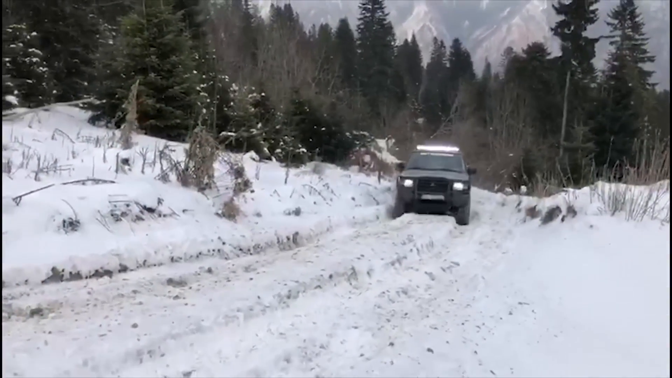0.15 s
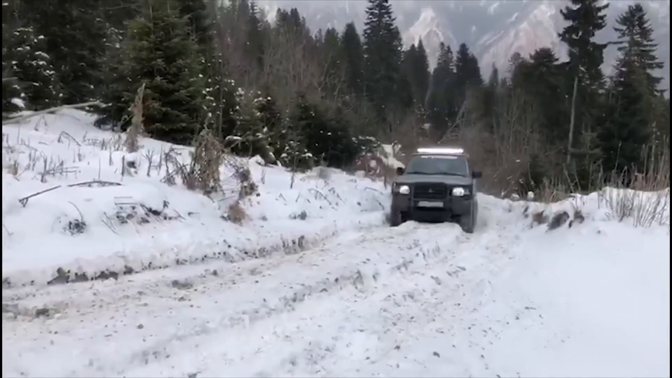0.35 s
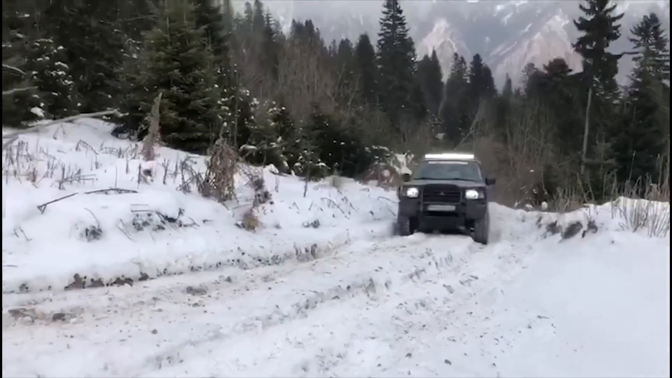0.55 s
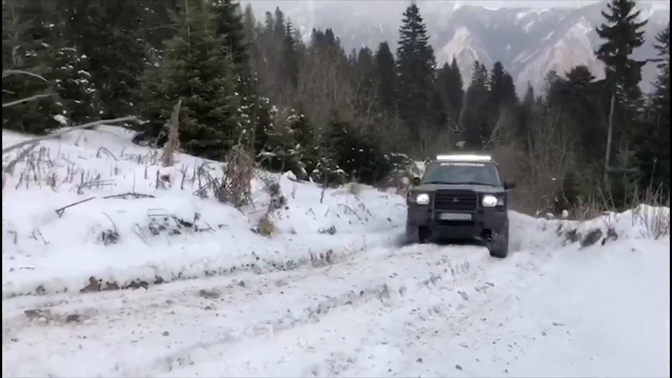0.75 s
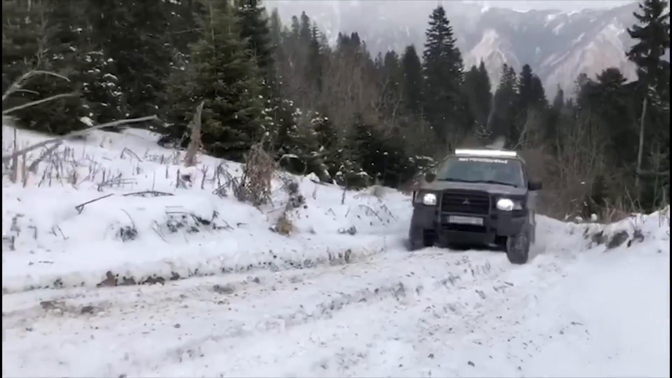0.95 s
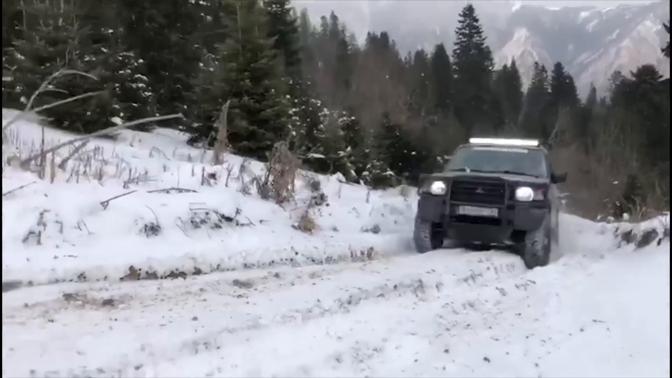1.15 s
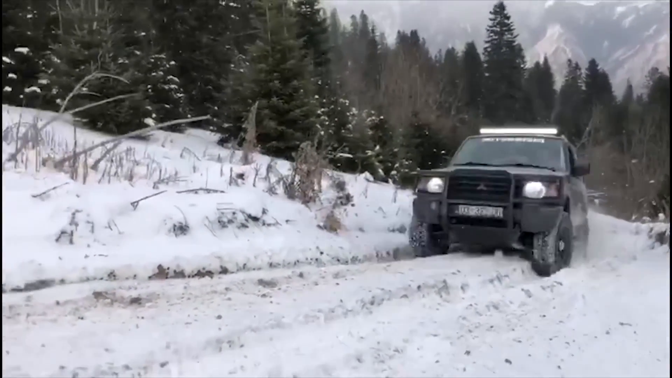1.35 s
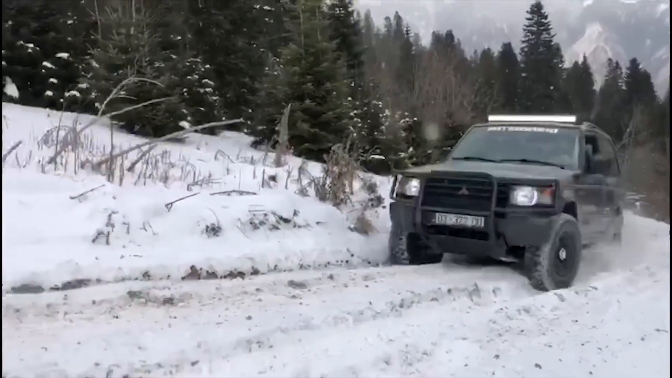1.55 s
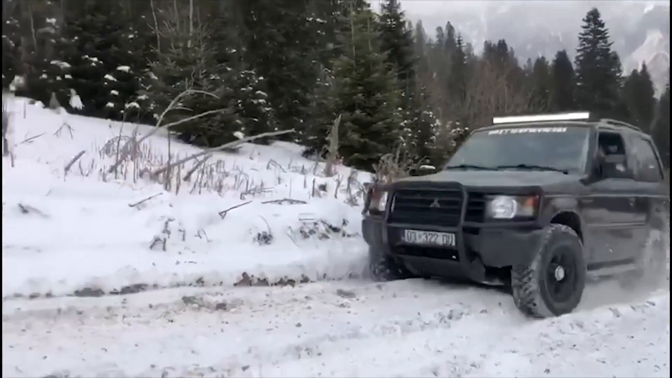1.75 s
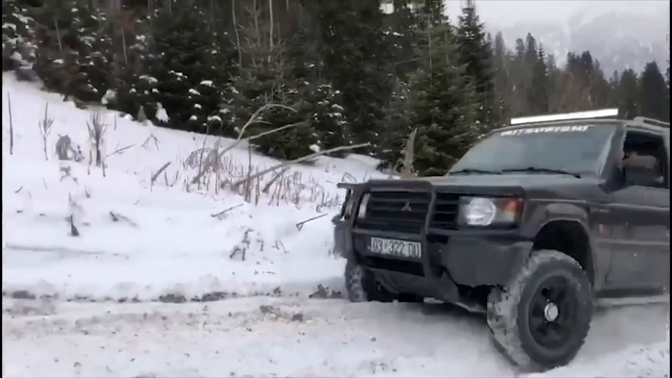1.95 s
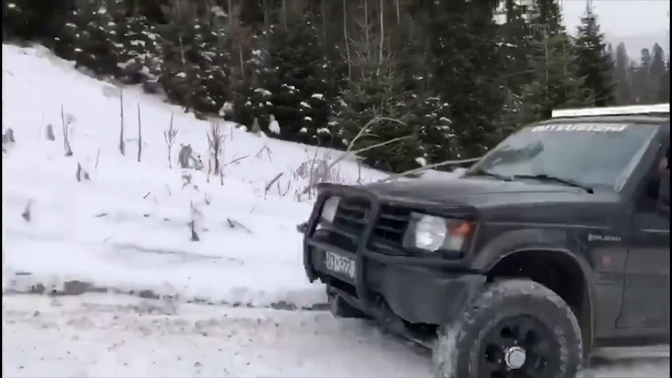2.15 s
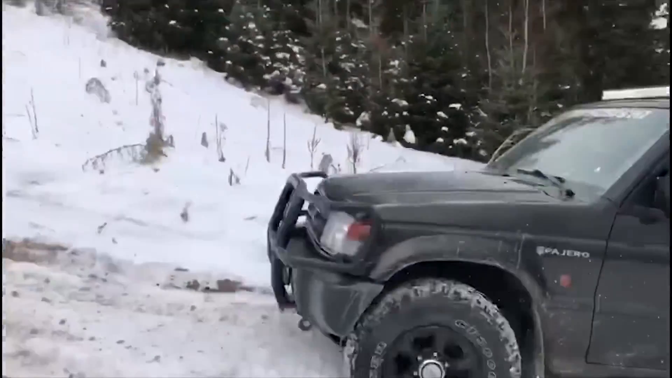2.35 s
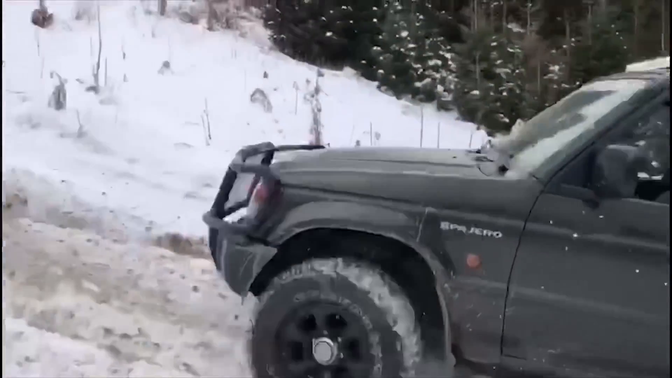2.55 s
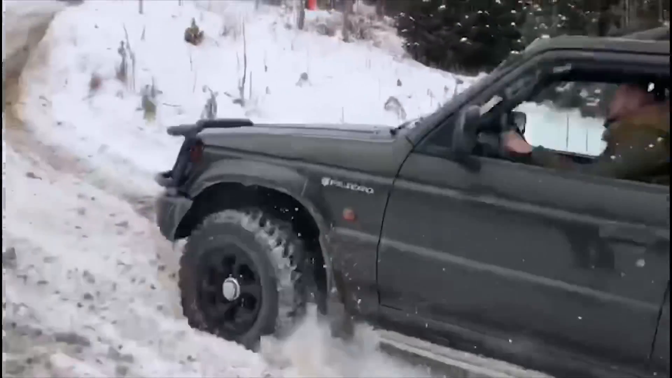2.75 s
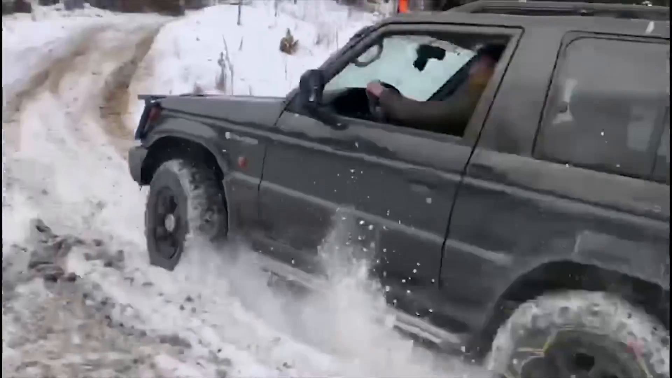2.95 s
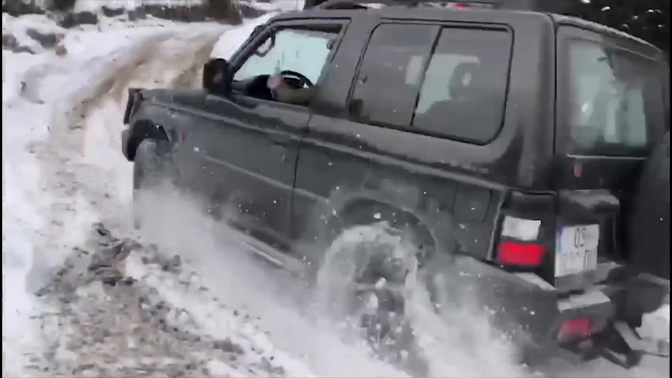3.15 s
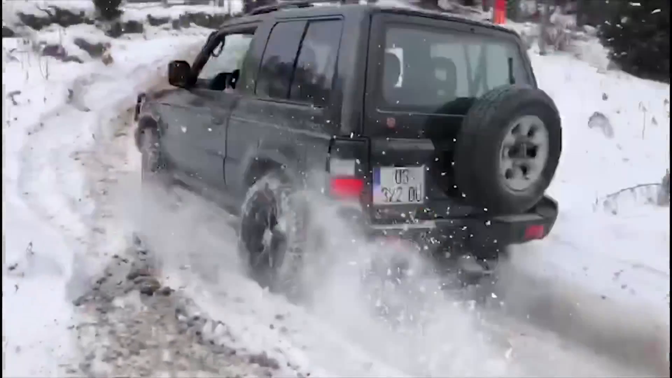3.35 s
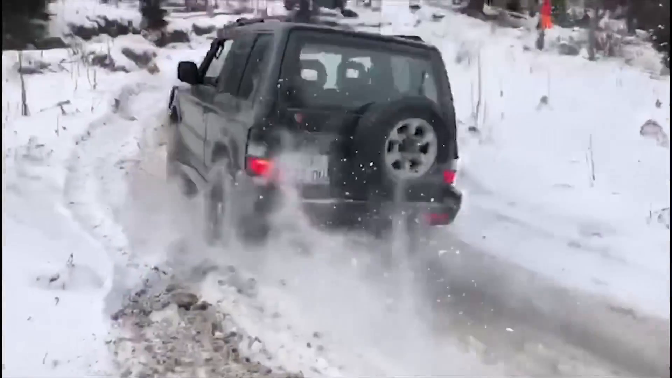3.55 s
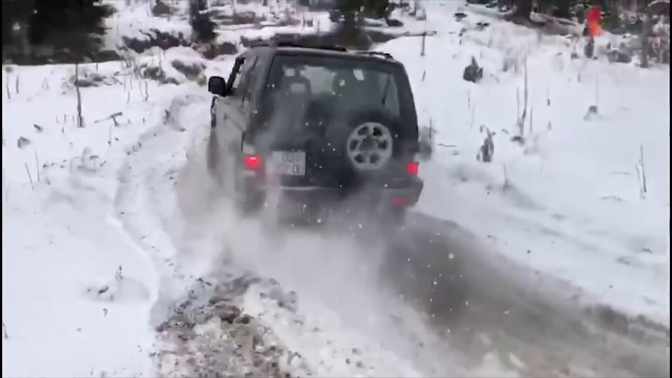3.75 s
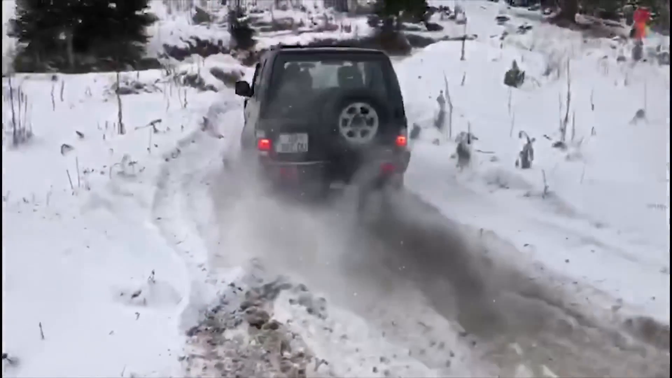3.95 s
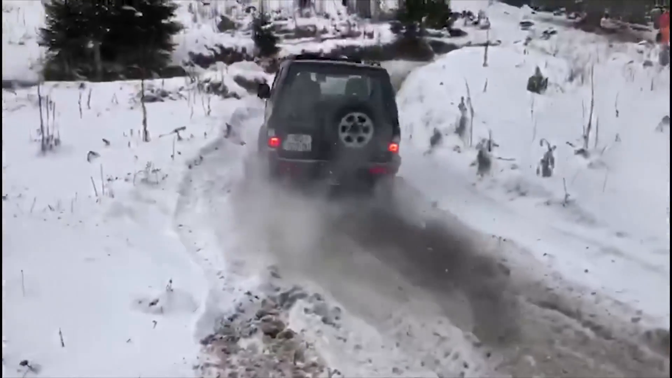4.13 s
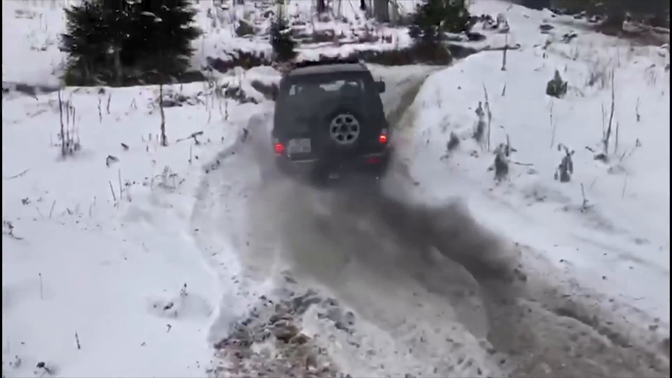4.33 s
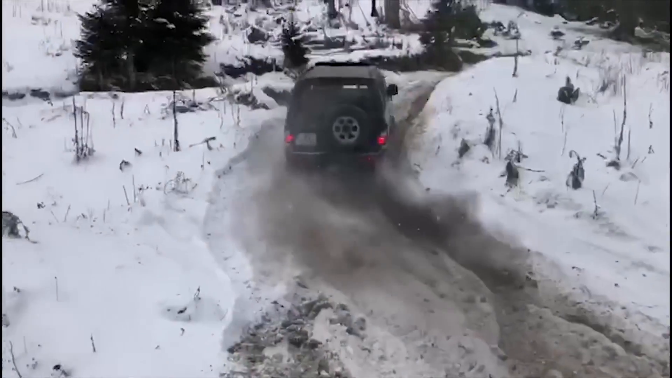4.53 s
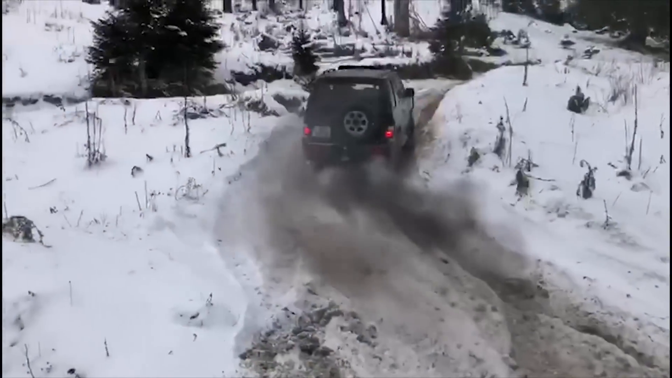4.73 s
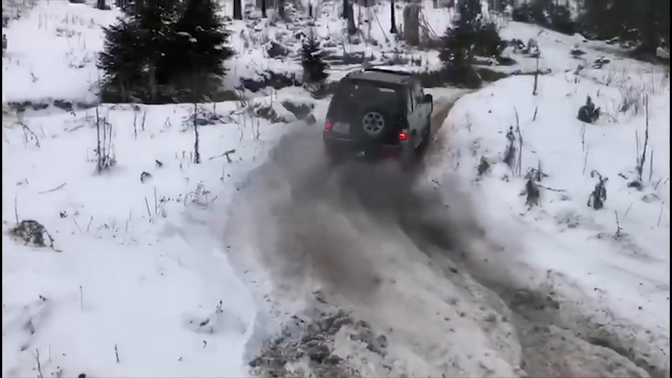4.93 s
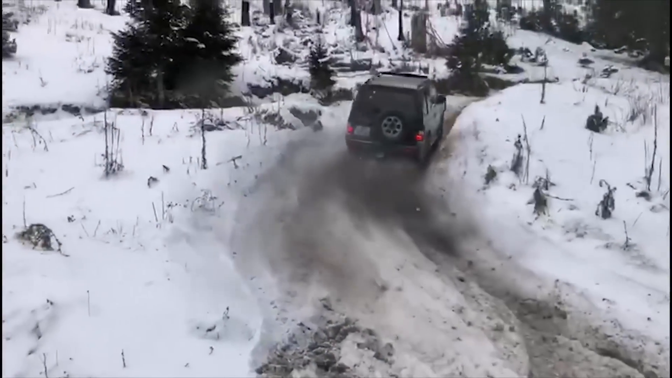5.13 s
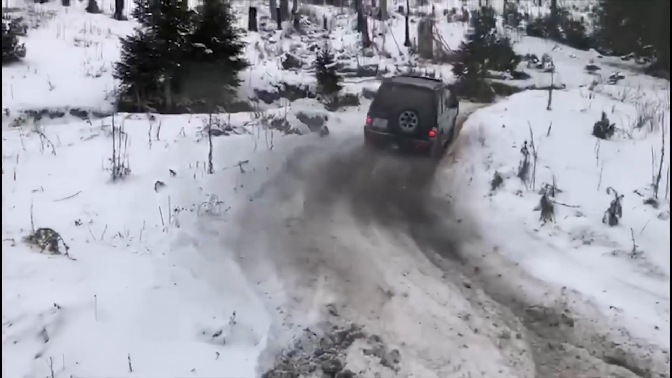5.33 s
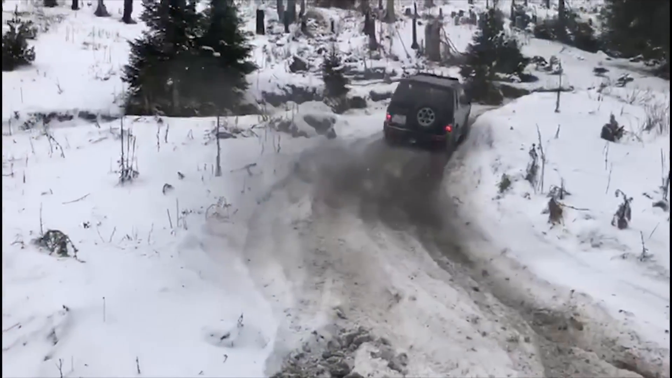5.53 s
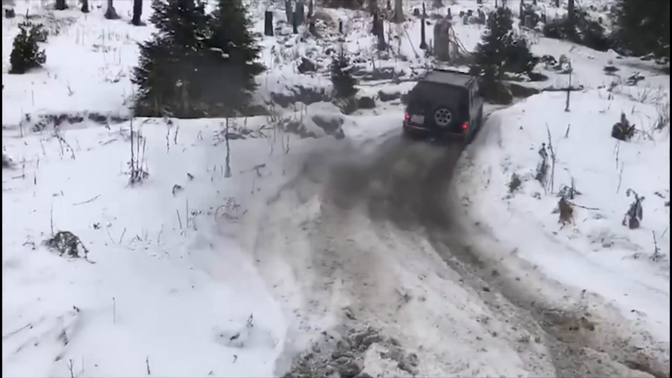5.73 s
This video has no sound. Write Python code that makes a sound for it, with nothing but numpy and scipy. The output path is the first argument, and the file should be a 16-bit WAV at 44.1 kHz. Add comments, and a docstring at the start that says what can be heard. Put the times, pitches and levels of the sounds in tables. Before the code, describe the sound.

A handheld microphone beside a snow-covered trail catches a hard-working engine coming closer, with a booming buzz and bright rattle. It jolts past with metallic clanks and suspension thuds, wheels flinging crunchy snow. From behind, a low firing drone and raspy, breathy exhaust surge several times, then gradually weaken with distance. The sound is dry and slightly dull on top.

```python
"""On a snowy uphill track, a four-cylinder 4x4 approaches at high revs, passes close by and pulls away.
From the front: crank orders, booming and clatter from the block, all timed by one crankshaft phase.
Alongside: filtered-noise tyres and snow, ringing steel knocks, sine thumps and sinking howls.
From behind: a sine drone at the firing rate and a hollow jet of gas, noise puffed at each firing."""
import sys
import numpy as np
from scipy import signal
from scipy.fft import rfft, irfft
from scipy.io import wavfile
from scipy.ndimage import uniform_filter1d

SR = 44100
rng = np.random.default_rng(int(sys.argv[2]) if len(sys.argv) > 2 else 0)


def bounce(signal):
    """Save signal as a 16-bit WAV file at the path given by the first command-line argument."""
    frames = np.transpose(np.atleast_2d(signal))
    limited = np.clip(frames, -1, 1)
    pcm = np.round(limited * 32767).astype(np.int16)
    wavfile.write(sys.argv[1], SR, pcm)


N = 259308
T = np.arange(N) / SR

# Turn of the vehicle: (time [s], share of the side-on sound [0-1])
SIDE_ON = [(1.55, 0.27), (2.0, 1)]
# Gas surges with the load: (time [s], roar [dB], rasp [dB], hiss [dB])
GAS_LEVELS = [(2.2, -51, -75, -78), (2.85, -38.5, -53, -54), (3.15, -23.5, -30, -42), (3.27, -23, -35, -42),
              (3.42, -24, -26.5, -40), (3.56, -22.5, -28, -41), (3.66, -25.5, -35.5, -39.5),
              (3.76, -27.5, -46, -40), (3.82, -25, -28, -35), (3.97, -22, -30.5, -40),
              (4.12, -25.5, -35.5, -38), (4.33, -29.5, -46.5, -45.5), (4.44, -29.5, -36.5, -43),
              (4.55, -30, -38.5, -36.5), (4.72, -31, -34.5, -38.5), (4.93, -29, -42, -43),
              (5.05, -33.5, -46, -51.5), (5.24, -31, -36.5, -38), (5.45, -31, -41, -49),
              (5.68, -34.5, -36, -45), (5.88, -35.5, -47.5, -52.5)]

# Drive past on a straight line
SPEED_IN_M_PER_S, SPEED_OUT_M_PER_S, CLOSEST_M = 4.46, 6.4, 3.08
NOSE_PASS_S, WHEELS_PASS_S, TAIL_PASS_S = 2.62, 2.95, 4  # each part nearest
THROB_DB = 1.2  # rms level wander from uneven firing


def amp(db):
    """Decibels to gain."""
    return 10 ** (np.asarray(db) / 20)


def unit(x):
    """Scales to rms 1."""
    return x / np.sqrt(np.mean(x ** 2) + 1e-20)


def curve(rows, t=T):
    """Joins (time, value) rows by straight lines."""
    return np.interp(t, *np.transpose(rows))


def levels(rows):
    """One gain curve per dB column of a table."""
    s, *columns = np.transpose(rows)
    return [amp(np.interp(T, s, db)) for db in columns]


def after(s, blend_s):
    """Goes smoothly from 0 to 1 around time s."""
    return (1 + np.tanh((T - s) / blend_s)) / 2


def swell(s, width_s):
    """Smooth bump of height 1 at time s."""
    return np.exp(-((T - s) / width_s) ** 2)


def add(mix, s, sound):
    """Mixes a sound in at time s."""
    part = mix[round(s * SR):][:len(sound)]
    part += sound[:len(part)]


def drift(per_s):
    """Low-passed random motion of rms 1."""
    hz = np.fft.rfftfreq(N, 1 / SR)
    spectrum = rfft(rng.standard_normal(N)) * np.exp(-(hz / per_s) ** 2)
    return unit(irfft(spectrum, N))


def shape(points, hz):
    """Gain of a short spectrum on a log-frequency axis, with skirts beyond its ends."""
    f, db = np.transpose(points)
    low_skirt = 1 / (1 + (f[0] / 2 / (hz + 1)) ** 4)
    high_skirt = 1 / (1 + (hz / f[-1] / 2) ** 4)
    return low_skirt * high_skirt * amp(np.interp(np.log(hz + 1), np.log(f), db))


def colour(x, points):
    """Filters by a short spectrum, to rms 1."""
    gain = shape(points, np.fft.rfftfreq(N, 1 / SR))
    return unit(irfft(rfft(x) * gain, N))


def grains(per_s, size_db):
    """Random clicks of either sign; size_db scales their random excess in level."""
    present = rng.random(N) < per_s / SR
    sign = rng.choice([-1, 1], N)
    return present * sign * amp(size_db * np.minimum(rng.exponential(1, N), 4))


def puffs(turns, steady, length, uneven_db):
    """Noise flaring at each firing, twice a turn, at random sizes; length is a share of a firing."""
    firing = (2 * turns).astype(int)
    size = amp(uneven_db * rng.standard_normal(N))[firing]
    flare = size * np.exp(-(2 * turns % 1) / length)
    return (steady + flare) * rng.standard_normal(N)


def notches(x, first_hz, spacing_hz, depth, fade_hz):
    """A short echo cuts evenly spaced notches, which slide as the vehicle's aspect changes."""
    # Echoes along the vehicle shorten side-on: (time [s], factor on notch frequencies)
    aspect = [(0, 0.94), (2.0, 1.08), (2.4, 1.23), (3.08, 1.262), (3.5, 1.053), (4.4, 1)]
    hz, t, z = signal.stft(x, SR, nperseg=1024, noverlap=768)
    seen_hz = hz[:, None] / curve(aspect, t)
    echo = depth / (1 + (seen_hz / fade_hz) ** 4)
    echo_phase = 2 * np.pi * (seen_hz - first_hz) / spacing_hz
    comb = abs(1 - echo * np.exp(1j * echo_phase)) / np.sqrt(1 + echo ** 2)
    return unit(signal.istft(z * comb, SR, nperseg=1024, noverlap=768)[1][:N])


def flicker(x, depth_db=2.5):
    """Random level changes in small patches of time and pitch."""
    z = signal.stft(x, SR, nperseg=512, noverlap=384)[2]
    patches = uniform_filter1d(rng.standard_normal(z.shape), size=4, axis=0)
    patches = unit(uniform_filter1d(patches, size=10, axis=1))
    return unit(signal.istft(z * amp(depth_db * patches), SR, nperseg=512, noverlap=384)[1][:N])


def spread_db(pass_s):
    """Level re nearest point: amplitude falls as one over the distance."""
    speed_m_per_s = np.where(T < pass_s, SPEED_IN_M_PER_S, SPEED_OUT_M_PER_S)
    along_m = speed_m_per_s * (T - pass_s)
    return -20 * np.log10(np.hypot(CLOSEST_M, along_m) / CLOSEST_M)


def nose_db(muffled_db=1, crest_s=1):
    """Engine-bay level: distance, plus muffling by a crest until the vehicle clears it."""
    return spread_db(NOSE_PASS_S) - muffled_db * (1 - after(crest_s, blend_s=0.32))


def hush(level_db=-57):
    """A faint, even hiss of filtered noise lies under everything."""
    # Hiss spectrum: (frequency [Hz], level [dB])
    hush_spectrum = [(2500, -12), (3600, 3), (4800, 1), (6000, -11), (10000, -15)]
    return amp(level_db) * colour(rng.standard_normal(N), hush_spectrum)


def ruts_db(width_s=0.052):
    """Short swells of the tyre rumble, mostly where the wheels drop into ruts."""
    # Rumble swells, ruts plus one further swell at 3.62 s: (time [s], rise of the rumble [dB])
    rut_rises = [(2.122, 4), (2.3, 4), (2.44, 5), (3.149, 3.5), (3.25, 3), (3.62, 3.5), (3.8, 4),
                 (4.09, 0.5), (4.551, 7.5)]
    return sum(db * swell(s, width_s) for s, db in rut_rises)


def tyres(rumble_db=-26, falloff=0.89, lumps_db=1.57, tread_db=-29, tread_s=3.054, tread_width_s=0.37,
          spray_db=-42.5):
    """Tyres rumble over ruts, treads roar when beside us, thrown snow is a spray of grains."""
    # Spectra: (frequency [Hz], level [dB])
    rumble_spectrum, tread_spectrum = [(20, -39), (35, -17.5), (55, -9.5), (80, -1.5), (120, -1.5),
                                       (170, -2), (250, -6), (340, -12), (450, -20), (560, -20.5),
                                       (1200, -32)], [(130, -11), (220, 1.5), (330, -10), (480, -5.5),
                                                       (650, -10.5), (1000, -15)]
    spray_spectrum = [(1500, -17), (3000, -8), (5200, -16.5), (6000, -12.5), (7800, -10.5), (9500, -12.5),
                      (12000, -25.5)]
    near_db = spread_db(WHEELS_PASS_S)
    rumble_level_db = rumble_db + falloff * near_db + ruts_db() + lumps_db * drift(5.2)
    rumble = amp(rumble_level_db) * colour(rng.standard_normal(N), rumble_spectrum)
    tread_gain = amp(tread_db) * swell(tread_s, tread_width_s)
    tread = tread_gain * colour(rng.standard_normal(N), tread_spectrum)
    spray = amp(spray_db + near_db) * colour(grains(per_s=6000, size_db=1.5), spray_spectrum)
    return rumble + tread + spray


def wheelspin():
    """The rear wheel spins beside us and flings sheets of snow, dense flickering grains."""
    # Snow sheets: (time [s], half-length [s], level [dB])
    sheets = [(3.182, 0.16, -37), (3.378, 0.11, -23.5), (3.565, 0.044, -30)]
    # Flung snow: (frequency [Hz], level [dB])
    flung_spectrum = [(1500, -6), (2400, -0.5), (3200, 1), (4200, 3), (5200, -7), (6100, 6.5), (7000, 2),
                      (8500, 5.5), (9600, 2), (10500, -11), (12000, -12)]
    snow = colour(grains(per_s=13000, size_db=0.0), flung_spectrum)
    wash = notches(snow, first_hz=474, spacing_hz=692.0, depth=0.59, fade_hz=7500)
    return flicker(wash) * sum(amp(db) * swell(s, width_s) for s, width_s, db in sheets)


def clods(level_db=-30, s=3.34, width_s=0.23, crumble_s=0.0025):
    """Lumps of packed snow pelt the wheel arches, each crumbling in a short noise decay."""
    # Crunch spectrum: (frequency [Hz], level [dB])
    clod_spectrum = [(700, -10), (1200, -5), (2300, 5), (3500, -6), (6000, -15)]
    hits = abs(grains(per_s=900, size_db=1.0))
    crumble = np.exp(-T[:SR // 30] / crumble_s)
    crunch = signal.fftconvolve(hits, crumble)[:N] * rng.standard_normal(N)
    return amp(level_db) * swell(s, width_s) * colour(crunch, clod_spectrum)


def knocks(scrape_s=0.013, ring=0.57, tick_hz=8000, tick_s=0.0038):
    """Loose steel rings under scraping blows; grit ticks on the panels as short noisy tones."""
    # Suspension knocks: (time [s], peak [dB])
    blows = [(2.327, -20), (2.422, -19.5), (2.436, -20), (2.455, -26), (2.47, -19), (2.488, -16.5),
             (2.512, -20), (2.539, -14), (4.982, -34)]
    # Steel modes: (frequency [Hz], relative level [dB], t60 before the ring factor [s])
    steel_modes = [(830, -7, 0.046), (921, 0, 0.072), (990, -15, 0.039), (1085, 3, 0.053),
                   (1366, -2.5, 0.039), (1464, -2.5, 0.026), (2110, -3.5, 0.031), (3230, -13, 0.025)]
    # Grit flicked at the body: (time [s], peak [dB])
    grit = [(2.162, -27)]
    out, t = np.zeros(N), T[:SR // 6]
    steel = np.zeros(len(t))
    for k, (hz, db, t60) in enumerate(steel_modes):
        decay = amp(db - 60 * t / (ring * t60))
        steel += (-1) ** k * decay * np.sin(2 * np.pi * hz * t)
    for s, db in blows:
        scrape = rng.standard_normal(len(t)) * np.exp(-t / scrape_s)
        blow = signal.fftconvolve(scrape, steel)[:len(t)]
        add(out, s, amp(db) * blow / abs(blow).max())
    for s, db in grit:
        noise = uniform_filter1d(rng.standard_normal(len(t)), size=12)
        tick = noise * np.sin(2 * np.pi * tick_hz * t) * np.exp(-t / tick_s)
        add(out, s, amp(db) * tick / abs(tick).max())
    return out


def thuds(rise_s=0.0033, decay_s=0.015):
    """The suspension takes a bump with a short, dull thump, a decaying sine."""
    # Thumps: (time [s], level before the envelope [dB], pitch [Hz])
    bumps = [(2.291, -12.5, 213), (2.384, -22, 176), (2.446, -10, 120), (2.722, -32, 129.5),
             (2.846, -16, 245), (3.127, -19, 161)]
    out, t = np.zeros(N), T[:SR // 10]
    for s, db, hz in bumps:
        envelope = np.minimum(t / rise_s, 1) * np.exp(-t / decay_s)
        add(out, s, amp(db) * envelope * np.sin(2 * np.pi * hz * t))
    return out


def howls():
    """Rough resonances of the roar swell and sink as the underside sweeps past."""
    # Howls: (time [s], half-length [s], pitch [Hz], sinking [Hz/s], width [Hz], level [dB])
    resonances = [(3.17, 0.2, 1110, 330, 30, -30.5), (3.58, 0.29, 810, 800, 150, -33.5),
                  (3.3, 0.2, 1770, 600, 66, -25.5), (3.17, 0.063, 3780, 800, 200, -32),
                  (4.71, 0.061, 3650, 300, 170, -40), (3.41, 0.16, 2350, 760, 160, -32),
                  (3.53, 0.056, 1570, 600, 68, -28)]
    out = np.zeros(N)
    for s, width_s, hz, sink_hz_per_s, width_hz, db in resonances:
        phase = 2 * np.pi * np.cumsum(hz - sink_hz_per_s * (T - s)) / SR
        band = drift(width_hz) * np.cos(phase) + drift(width_hz) * np.sin(phase)
        out += amp(db) * swell(s, width_s) * unit(band)
    return out


def rattle(turns, level_db=-43, s=1.05, width_s=0.46):
    """A bright rattle at each firing comes through the grille while it points at us."""
    # Rattle spectrum: (frequency [Hz], level [dB])
    rattle_spectrum = [(1450, -20), (1650, -2), (1850, 3), (2050, -6), (2300, -25)]
    bursts = puffs(turns, steady=0.5, length=0.25, uneven_db=1.2)
    return amp(level_db) * swell(s, width_s) * colour(bursts, rattle_spectrum)


def boom(turns):
    """Intake boom: sines at three and four times the crank speed take turns to dominate."""
    # Boom: (time [s], third order [dB], fourth order [dB])
    boom_levels = [(0, -49, -47), (0.9, -52, -44), (1.15, -42, -40.5), (1.37, -45.5, -32),
                   (1.73, -31.5, -37), (1.87, -31.5, -43), (2.15, -29.5, -45), (2.38, -35, -31),
                   (3.1, -32, -40.5), (3.5, -43, -45), (3.93, -36, -44), (4.3, -45, -53), (5.88, -46, -45)]
    third, fourth = levels(boom_levels)
    return third * unit(np.sin(6 * np.pi * turns)) + fourth * unit(np.sin(8 * np.pi * turns))


def hum(turns, level_db=-26.0, screened_db=-6.5, muffled_db=4.9, waver_db=1.5, waver_db_per_order=0.08,
        waver_turns=0.0053, dip_db=-0.3, dip_s=1.34, dip_width_s=0.15):
    """Block and intake radiate crank orders; balance follows the facing side, high ones waver most."""
    # Crank orders: (multiple of crank speed, relative level head-on [dB], side-on [dB])
    orders = [(1, -7, -20), (3.5, -12, -9), (4.5, -14, -10), (5, -12, -10.5), (5.5, -24, -8),
              (6, -17.5, -9.5), (6.5, -25.5, -10.5), (7, -19.5, -10), (8, -20.5, -12.5), (9, -29, -21),
              (10, -12, -22.5), (11, -12, -20.5), (12.5, -18, -17), (12, -17, -23), (13, -14.5, -14),
              (14, -9.5, -18), (15, -21, -17.5), (16, -14, -17), (17, -12, -15)]
    side = curve(SIDE_ON)
    lines = np.zeros(N)
    for k, front_db, side_db in orders:
        balance_db = front_db + side * (side_db - front_db)
        gain = amp(balance_db + (waver_db + waver_db_per_order * k) * drift(13.0))
        order_turns = k * (turns + waver_turns * drift(26.0)) + rng.random()
        lines += gain * np.cos(2 * np.pi * order_turns)
    effort_db = dip_db * swell(dip_s, dip_width_s) + THROB_DB * drift(40)
    path_db = nose_db(muffled_db) + screened_db * after(NOSE_PASS_S, blend_s=0.38)
    return amp(level_db + path_db + effort_db) * lines


def clatter(turns, repeat=0.34, uneven_db=3.0, level_db=-32.5, grille_db=2.0, screened_db=-14,
            hidden_s=3.9):
    """Combustion and valve noise: part repeats every two turns, part is fresh at each firing."""
    # Block spectrum: (frequency [Hz], level [dB])
    clatter_spectrum = [(250, -5), (400, -2.5), (490, 1), (570, -16), (660, -2.5), (850, -2.5),
                        (1100, -4.5), (1500, -3), (1900, -4), (2280, -12), (2600, -11), (3080, -28),
                        (3630, -14), (4200, -25.5), (4800, -29), (5500, -36), (11500, -35)]
    partials = amp(uneven_db * rng.standard_normal(700)) * np.exp(2j * np.pi * rng.random(700))
    cycle = irfft(partials)  # one four-stroke cycle: a line at every half order
    repeating = np.interp(turns / 2 % 1, np.linspace(0, 1, len(cycle)), cycle)
    fresh = puffs(turns, steady=0.6, length=0.13, uneven_db=4.0)
    drive = np.sqrt(repeat) * unit(repeating) + np.sqrt(1 - repeat) * unit(fresh)
    coloured = colour(drive, clatter_spectrum)
    block = notches(coloured, first_hz=478, spacing_hz=869, depth=0.44, fade_hz=4800)
    # the body screens the engine once it has gone by
    facing_db = grille_db * (1 - curve(SIDE_ON)) + screened_db * after(hidden_s, blend_s=0.18)
    return amp(level_db + nose_db() + facing_db) * block


def shell(turns, level_db=-8, falloff=0.58):
    """Gas pulses shake the silencer's steel modes, loudest from close by."""
    # Silencer modes: (frequency [Hz], pole half-width [Hz], relative level [dB])
    shell_modes = [(1089, 19, 3), (1691, 29, 11), (1840, 33, 6), (2083, 17, 3), (5900, 60, -39)]
    hz = np.fft.rfftfreq(N, 1 / SR)
    response = sum(amp(db) / (1 + 1j * (hz - f) / width) ** 2 for f, width, db in shell_modes)
    pulses = puffs(turns, steady=0.89, length=0.33, uneven_db=8.5)
    ringing = unit(irfft(rfft(pulses) * response, N))
    roaring = levels(GAS_LEVELS)[0]
    return amp(level_db + falloff * spread_db(TAIL_PASS_S)) * roaring * ringing


def drone(turns, burble_db=-7, burble_s=3.15):
    """The silencer passes a sine at the firing rate and, once the tail faces us, a ragged burble."""
    # Firing note: (time [s], level [dB])
    note_levels = [(0, -48.5), (0.85, -41), (1.55, -39), (1.8, -41), (2.15, -38.5), (2.45, -32.5),
                   (3.0, -26), (3.4, -25.5), (3.67, -22), (3.95, -26.5), (4.7, -30), (5.58, -31),
                   (5.88, -33.5)]
    # Burble spectrum: (frequency [Hz], level [dB])
    burble_spectrum = [(130, -6), (175, 1), (240, 0), (340, -10), (450, -22), (700, -28)]
    ragged = colour(puffs(turns, steady=1.0, length=0.29, uneven_db=4.0), burble_spectrum)
    burble = amp(burble_db) * after(burble_s, blend_s=0.25) * ragged
    note = amp(THROB_DB * drift(37)) * unit(np.sin(4 * np.pi * turns))
    return levels(note_levels)[0] * (note + burble)


def jet(turns, flutter_db=0.8):
    """Exhaust gas rushes out in puffs on a steady flow: hollow roar, rasp and flickering hiss."""
    # Spectra: (frequency [Hz], level [dB])
    roar_spectrum, rasp_spectrum, hiss_spectrum = [(300, -20), (450, -5), (560, -4.5), (850, -4.5),
                                                   (1150, 3), (1500, 2.5), (2200, 0.5), (2700, -15),
                                                   (3600, -18.5), (4300, -25), (5300, -54), (7000, -53)], [(1700, -1.5), (2300, 4.5), (2900, 0.5),
                                                                (3700, 0), (4200, -9), (4800, -9),
                                                                (5500, -34)], [(2500, -10), (3600, 10),
                                                                              (4250, -13), (4750, 3),
                                                                              (5300, -3), (6100, 1),
                                                                              (7000, -0.5), (8200, 3.5),
                                                                              (9700, -3), (10500, -2.5),
                                                                              (12000, -22)]

    def hollow(spectrum):
        """Puffed gas noise, notched by an echo."""
        gas = colour(puffs(turns, steady=2.2, length=0.25, uneven_db=3.5), spectrum)
        return notches(gas, first_hz=456, spacing_hz=696.0, depth=0.89, fade_hz=5140)

    roar, rasp = hollow(roar_spectrum), hollow(rasp_spectrum)
    hiss = flicker(colour(grains(per_s=9000, size_db=0.0), hiss_spectrum))
    roaring, rasping, hissing = levels(GAS_LEVELS)
    return amp(flutter_db * drift(23)) * (roaring * roar + rasping * rasp + hissing * hiss)


def scene():
    """One crankshaft drives every engine sound; open snow gives no reverberation."""
    # Crankshaft: (time [s], speed [turns/s])
    crank_speed = [(0.0, 65.1), (0.3, 63.2), (0.52, 63.7), (0.64, 64.7), (0.82, 62.0), (1.1, 62.2),
                   (1.3, 63.7), (1.51, 61.2), (1.7, 63.1), (1.83, 59.8), (1.97, 57.7), (2.15, 59.6),
                   (2.85, 60.7), (3.1, 63.3), (3.38, 61.2), (3.62, 64.6), (3.87, 59.3), (4.12, 63.7),
                   (4.35, 60.5), (4.58, 63.2), (5.0, 58.8), (5.57, 53.3), (5.88, 58.2)]
    turns = np.cumsum(curve(crank_speed)) / SR
    snow_and_body = hush() + tyres() + wheelspin() + clods() + knocks() + thuds() + howls()
    engine = rattle(turns) + boom(turns) + hum(turns) + clatter(turns)
    exhaust = shell(turns) + drone(turns) + jet(turns)
    return (snow_and_body + engine + exhaust)[None]


def record(dry, edge_hz=11700):
    """The recorder's band limit, a linear-phase low-pass."""
    low_pass = signal.firwin(511, edge_hz, window=("kaiser", 9), fs=SR)
    return signal.oaconvolve(dry, low_pass[None], "same")


dry = scene()
out = record(dry)
bounce(out)
```